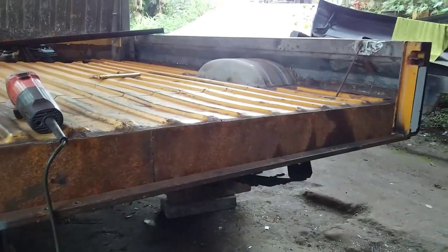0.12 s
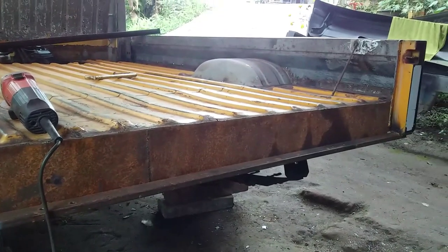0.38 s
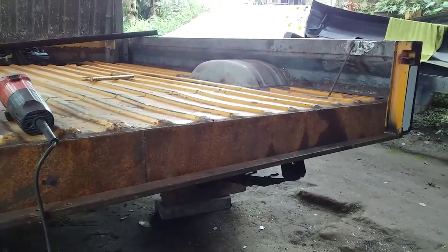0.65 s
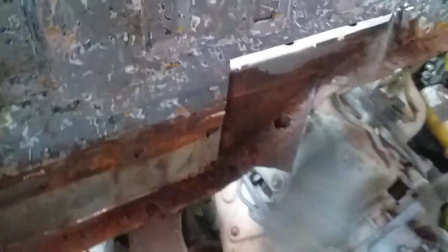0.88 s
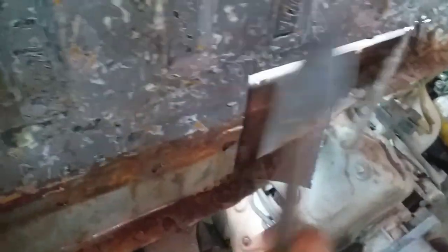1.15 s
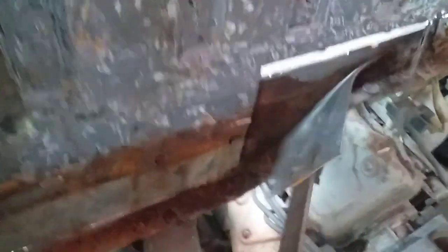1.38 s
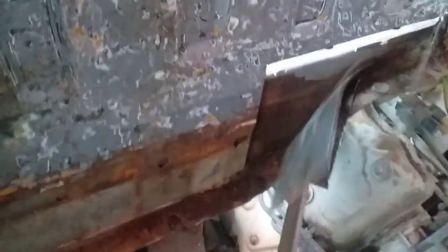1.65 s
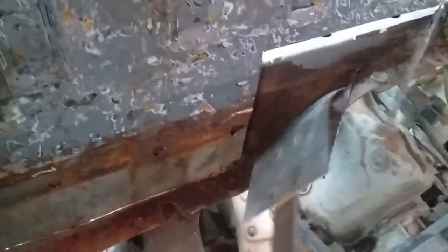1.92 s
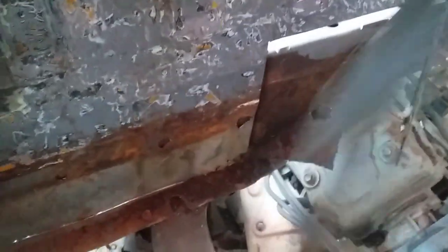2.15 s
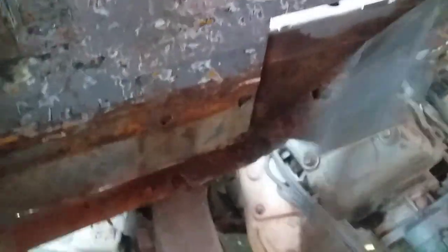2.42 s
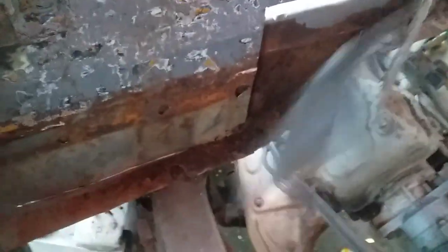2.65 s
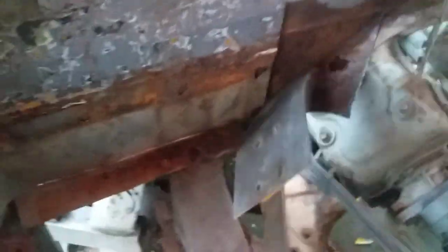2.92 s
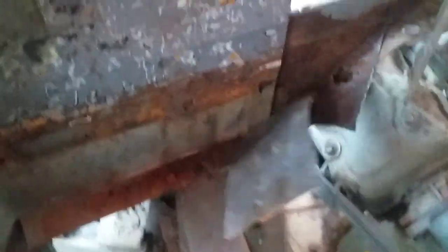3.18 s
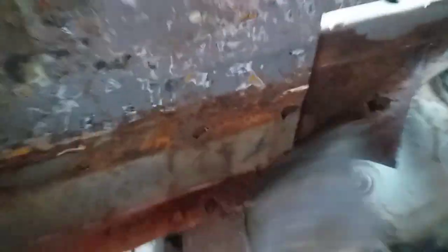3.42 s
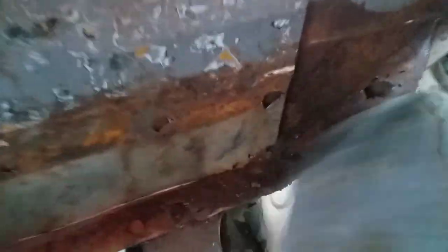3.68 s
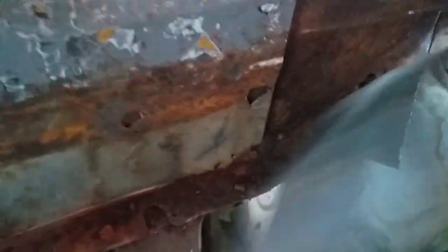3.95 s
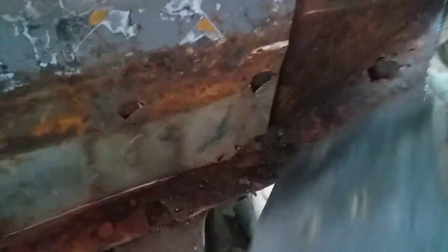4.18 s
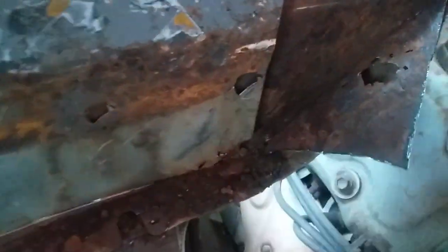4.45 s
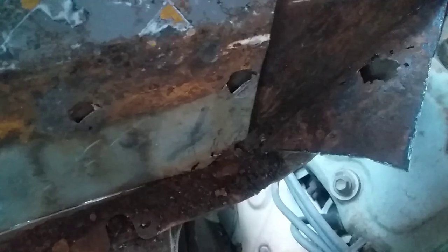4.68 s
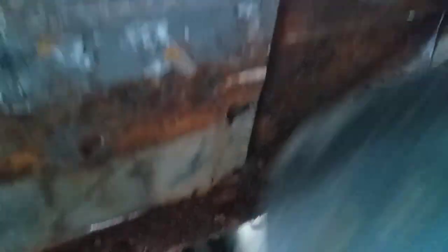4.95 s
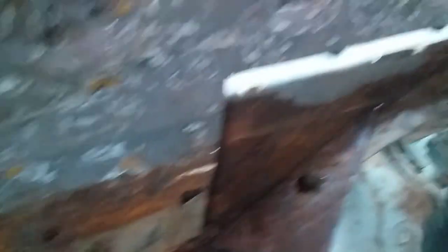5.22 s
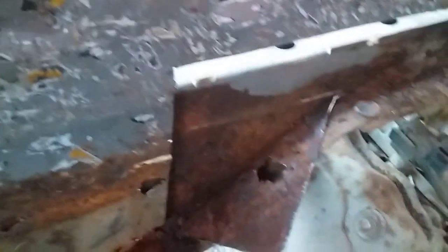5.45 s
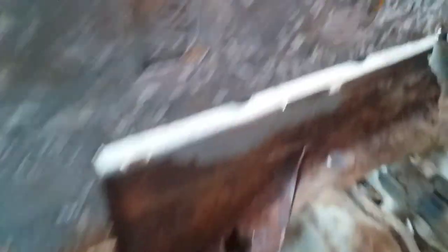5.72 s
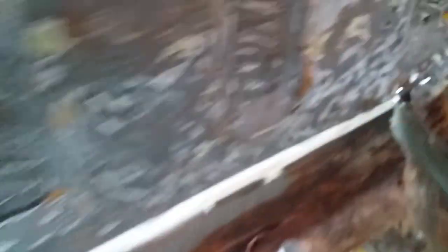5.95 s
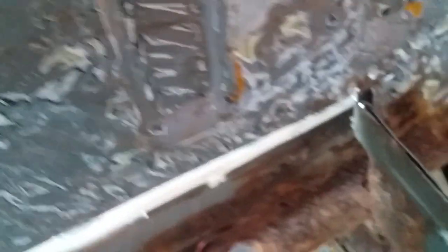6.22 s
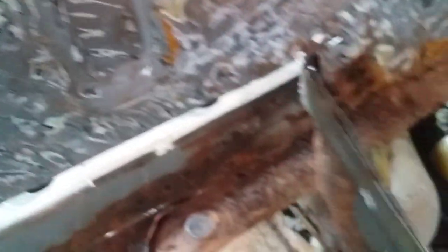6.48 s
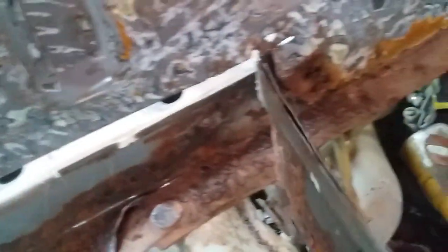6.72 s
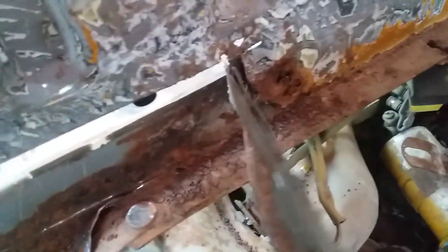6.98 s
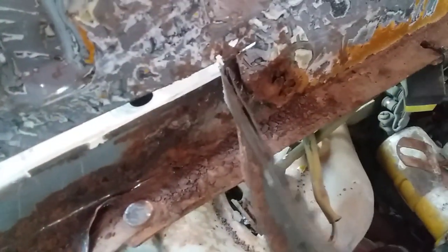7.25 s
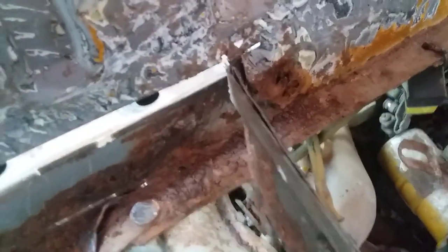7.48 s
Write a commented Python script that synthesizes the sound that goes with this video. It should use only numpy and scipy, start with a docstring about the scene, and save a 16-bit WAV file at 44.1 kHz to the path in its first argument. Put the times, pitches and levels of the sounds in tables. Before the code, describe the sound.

A distant power tool whirs steadily for under a second, then stops into a tiny silence. Close hammer blows strike a steel panel, sharp and boomy, with a loose plate clinking and ringing between them. The blows end, a few light clinks follow, then the plate is dragged with gritty scrapes. Faint engine idle, insect drone and soft hiss remain. Open shed, close handheld microphone, almost mono.

```python
"""A hammer beats a rusty steel panel in an open shed: each blow is coloured noise and ringing modes.
A loose plate clinks and rings as decaying modes, and is dragged aside with filtered noise grains.
First a far power tool whirs with steady lines over noise, then comes a short silence.
Under the blows an engine idles as tones over noise, an insect band drones and hiss swells.
One microphone feeds both channels; only the top treble differs faintly between them."""
import sys
import numpy as np
from scipy import signal
from scipy.fft import rfft, irfft, next_fast_len
from scipy.io import wavfile
from scipy.ndimage import map_coordinates

SR = 44100
rng = np.random.default_rng(int(sys.argv[2]) if len(sys.argv) > 2 else 0)


def transcribe(u):
    """Save the signal u as a 16-bit wav file named by the first command-line argument.

    u: samples, shape (n,) or (channels, n), limited to [-1, 1]; the rate is SR.
    q: integer samples, one column per channel.
    """
    v = np.clip(np.atleast_2d(u).T, -1, 1)
    q = np.round(v * 32767).astype(np.int16)
    wavfile.write(sys.argv[1], SR, q)


def rack_gain(trim_db):
    """Turn a fader trim in dB into the linear factor to multiply a signal by."""
    fader = np.asarray(trim_db, float)
    return 10 ** (fader / 20)


N = 335889

# Every colour table is a noise spectrum: f/Hz, relative level/dB per Hz
# far tool: its steady lines (f/Hz, rms level/dB) and the colour of its air noise
TOOL_LINES = [(328.4, -65), (543.7, -63.5), (1087, -59.5), (1244, -56.5), (1631, -63), (2175, -65.5),
              (3165, -71), (7246, -72.5), (13840, -80), (14002, -92)]
TOOL_COLOUR = [(24, -51), (40, -9), (256, -7.5), (312, 1), (392, -6), (1070, -8), (1150, -11), (1240, -11),
               (1340, -7.5), (2210, -12.5), (6020, -23.5), (7360, -22), (10400, -42), (14100, -47),
               (16000, -52.5)]
# insect and hiss colours, then the middle of each soft hiss swell (t/s)
INSECT_COLOUR = [(2470, -40), (4200, -22.5), (5940, -20), (7150, 3.5), (9510, -23.5), (11300, -36),
                 (13200, -35.5), (13500, -14.5), (14500, -24.5), (14800, -33.5), (16000, -34.5)]
HISS_COLOUR = [(1760, -58.5), (3000, -14), (3310, -19.5), (4810, -10), (6080, -6.5), (7400, -1.5),
               (8460, -0.5), (10200, -19.5), (12400, -11), (14600, -11), (16200, -24.5)]
PUFF_TIMES = [4.66, 6.375, 7.18]
# thin double squeal: f/Hz, level/dB, start t/s
SQUEALS = [(3547, -61, 6.4), (3830, -64.5, 6.44)]
# faint far bumps: t/s, level/dB, f/Hz, length/s
BUMPS = [(4.964, -73, 451, 0.15), (5.961, -62, 1194, 0.038), (6.477, -66.5, 1310, 0.052),
         (6.66, -64.5, 1160, 0.087), (6.906, -74.5, 1330, .06), (7.066, -68, 2647, 0.047),
         (7.33, -69, 4400, 0.022)]
# engine: t/s, firing rate f/Hz, 3rd order level/dB, 5th order level/dB, 6th order level/dB
ENGINE_PATH = [(4.4, 34.04, -54.5, -56, -61.5), (4.7, 33.6, -55.5, -67, -68),
               (5.05, 33.34, -58.5, -58.5, -66.5), (5.8, 33.18, -50, -58.5, -50),
               (6.15, 32.79, -49, -65, -46), (6.43, 32.38, -51.5, -54, -52),
               (7.068, 31.96, -60, -50, -52.5), (7.206, 32.01, -59.5, -49.5, -52.5),
               (7.368, 30.1, -48.5, -48, -60.5), (7.524, 31.85, -53.5, -56, -46.5),
               (7.617, 31.6, -49.5, -48, -53.5)]
# weak engine orders: multiple of the firing rate, level/dB over the mean strong order
WEAK_ORDERS = [(2, -15), (4, -8), (7, -9.5), (8, -11.5), (9, -16), (10, -15.5)]
# engine rumble and road rush colours, then the rush over time (t/s, level/dB)
RUMBLE_COLOUR = [(21, -46), (35, -16), (75, -4), (145, 4.5), (177, -1.5), (300, -21.5), (390, -50),
                 (660, -120)]
RUSH_COLOUR = [(150, -28.5), (250, 3), (321, 3), (355, 0), (398, -6.5), (3110, -29), (3700, -23.5),
               (4040, -29), (5000, -25), (6500, -57), (11000, -120)]
RUSH_PATH = [(4.4, -62), (4.8, -69.5), (5.11, -71), (5.9, -55), (6.214, -61.5), (6.55, -56.5)]
# drag strokes: start t/s, rise/s, hold/s, grit level/dB, boom level/dB
DRAG_STROKES = [(5.118, 0.045, 0.011, -24, -29.5), (5.35, 0.076, 0.027, -18, -39),
                (5.501, 0.03, .055, -39, -45)]
# colours of gritty steel contact and of the boom under the drag
GRIT_COLOUR = [(760, -32.5), (1300, -9), (1340, -19.5), (1950, -7), (2650, -12), (2890, -7.5), (3760, -9),
               (3970, -14.5), (6610, -10.5), (10700, -27), (14200, -17.5), (15600, -31), (16500, -48)]
DRAG_BOOM_COLOUR = [(24, -50), (40, -28), (81, 7), (145, -13), (184, 2), (241, -12), (300, 1), (390, -55),
                    (660, -120)]
# resonances under the drag, high and low: f/Hz, width/Hz, relative level/dB
SCRAPE_HIGH = [(2200, 35, -8.5), (2804, 160, 0.5), (3400, 43, -2), (4080, 49, -5), (4570, 19, 0.5),
               (4610, 19, -8), (5270, 140, -15), (5850, 22, -8.5), (6560, 41, -5.5), (7490, 40, -1.5),
               (7565, 140, -7.5), (8760, 130, -6)]
SCRAPE_LOW = [(339, 6.2, -4), (533, 40, 2), (823, 35, -0.5), (645, 21, -4), (1067, 18, -4.5),
              (1246, 14, -8)]
# plate knocks: t/s, strength level/dB, 3.2 kHz mode level/dB, 4.1 kHz mode level/dB, favoured f/Hz
CLINKS = [(0.8624, -22, -47, -61, 7700), (0.8999, -34, -42, -39, 4080), (0.9594, -48, -50, -56, 3180),
          (1.1206, -16.5, -26.5, -29.5, 5200), (1.1581, -38.5, -34, -41, 4080),
          (1.3382, -13, -12.5, -43, 4900), (1.4206, -25.5, -28.5, -40, 3360), (1.6257, -19, -33, -44, 7500),
          (1.7125, -21.5, -55, -56, 3520), (1.7496, -32, -59, -56, 5030), (1.8093, -31, -62.5, -67, 7940),
          (1.9389, -47, -42, -48, 7780), (1.952, -34.5, -36.5, -41.5, 3340),
          (2.1774, -14.5, -21.5, -45, 3630), (2.1924, -14.5, -36, -38, 3555),
          (2.281, -27, -39.5, -59, 5035), (2.3084, -33.5, -43, -38, 4080), (2.4119, -30, -55, -47, 3330),
          (2.4386, -16.5, -33, -46, 5447), (2.4549, -17.5, -47, -48, 3700), (2.5516, -48, -49, -68, 3400),
          (2.6638, -10.5, -46, -33, 7660), (2.8846, -17.5, -51, -36, 3650), (3.1274, -21, -50, -49, 4430),
          (3.5641, -20.5, -58, -47, 8000), (3.7084, -39.5, -80, -85, 6170),
          (3.7921, -19.5, -50.5, -47, 3520), (4.0615, -31.5, -58, -43.5, 4060),
          (4.099, -32, -61, -55, 3480), (4.1206, -32, -68, -65, 7490), (4.153, -36, -72, -54.5, 4700),
          (4.228, -38, -50, -55, 4140), (4.2352, -29.5, -47, -58.5, 6500), (4.4428, -67, -65, -82, 4900),
          (5.131, -26.5, -62, -56, 3630), (5.1517, -31.5, -56, -57, 3600), (5.1711, -36.5, -60, -48, 3610),
          (5.4127, -20.5, -44, -27.5, 4140), (5.434, -18.5, -38, -37, 3400),
          (5.4588, -21.5, -42, -32.5, 7490), (5.5279, -40.5, -39, -57, 3370),
          (5.5659, -27, -33.5, -47, 3200), (5.5893, -30, -41.5, -22.5, 1930)]
# plate modes, one entry each: f/Hz; natural 60 dB decay/s; relative level/dB
PLATE_HZ = [3182, 4081, 1184, 1631, 2471, 3391, 3600, 4544, 4899, 5399, 5674, 6345, 7418, 7800, 8732, 9889,
            11920]
PLATE_T60 = [.52, .42, .2, .17, .12, .16, .09, .11, .14, .08, .12, .14, .14, .09, .11, .11, .1]
PLATE_DB = [.1, .1, 2, -6, 4, -6, -0.1, -5, -9, 1, -1.5, -5, -4, -1, -1, -18, -18.5]
# hammer blows: t/s, crack level/dB, boom level/dB, body level/dB, panel pitch the spot favours f/Hz
BLOWS = [(0.857, -21.5, -20.5, -18, 262), (1.062, -29, -24.5, -29, 533), (1.1195, -22.5, -24, -25.5, 217),
         (1.3355, -21.5, -23.5, -17.5, 414), (1.3615, -17.5, -21, -14.5, 210),
         (1.6299, -13, -40.5, -28.5, 1075), (1.6444, -21, -21.5, -16.5, 330),
         (2.1789, -14, -25, -22.5, 345), (2.413, -37.5, -45.5, -42.5, 210),
         (2.4408, -15.5, -31.5, -23, 380), (2.6657, -22.5, -33.5, -31.5, 900),
         (2.674, -30.5, -29, -26, 607), (2.8781, -22.5, -35, -29.5, 616), (2.898, -33, -28, -25.5, 400),
         (3.1143, -18.5, -33, -24.5, 710), (3.132, -26, -27, -24.5, 407), (3.3337, -26.5, -31, -24.5, 375),
         (3.5574, -26, -30.5, -32.5, 783), (3.5658, -31, -30, -22, 370), (3.7875, -24, -29.5, -15, 420),
         (3.9795, -20.5, -27, -16.5, 496)]
# colours of the three parts of a blow, from low to high
BOOM_COLOUR = [(24, -59.5), (40, -25), (59, -20), (81, -1.5), (155, -3.5), (198, 8), (300, -3), (390, -43),
               (660, -120)]
BODY_COLOUR = [(130, -38.5), (220, -15), (292, -10.5), (352, -4), (487, -4.5), (518, -11), (675, -4.5),
               (895, -8), (1160, -9.5), (1430, -16), (1700, -13.5), (2210, -40.5), (3740, -120)]
CRACK_COLOUR = [(760, -43.5), (1300, -6.5), (1970, -3), (2170, -5.5), (3570, 0.5), (3970, -7), (4420, -2.5),
                (5950, -8), (7670, -5), (10300, -22.5), (13300, -16.5), (16000, -25.5), (16500, -50.5)]
# how fast the panel dies away before damping: f/Hz, 60 dB decay/s
PANEL_DECAY = [(60, 0.41), (200, 0.67), (500, 0.45), (1200, 0.24), (3000, 0.12), (8000, 0.13),
               (15000, 0.13)]
# single panel modes: f/Hz, relative level/dB, 60 dB decay/s before damping
PANEL_MODES = [(74, -22, 0.2), (103, -18.5, 0.18), (151.8, -2, 0.54), (201, -8, 0.25), (207, -2.5, 0.62),
               (267, -2.5, 0.41), (309, -2, 0.44), (335.7, 3, 0.34), (375, 9.5, 0.21), (421, -1.5, 0.39),
               (495, -7, .3), (546.5, 0, 0.34), (581, -1, 0.21), (624, -4.5, 0.25), (703, -8, 0.2),
               (787, -6.5, 0.58), (850, -1, 0.085), (1020, -5.5, 0.023), (989.6, -16, 0.085)]
# two deep modes that beat under the boom: f/Hz, relative level/dB, 60 dB decay/s
FRAME_MODES = [(76.5, -2.5, 0.45), (99.1, -3, 0.67)]


def unit(x):
    """Scale to rms 1 along the last axis."""
    return x / np.sqrt(np.mean(x ** 2, -1, keepdims=True) + 1e-20)


def along(points, hz):
    """Read (Hz, value) points on a log frequency axis."""
    f, value = np.transpose(points)
    return np.interp(np.log(hz + 1), np.log(f + 1), value)


def curves(table):
    """Draw one value per sample for each column after the time."""
    s, *columns = np.transpose(table)
    return [np.interp(np.arange(N) / SR, s, column) for column in columns]


def wobble(rate):
    """A smooth random curve with rate knots a second."""
    knots = rng.standard_normal(int(N * rate / SR) + 4)
    return map_coordinates(knots, [np.arange(N) * rate / SR])


def noise(colour, size=N, source=None, peaky_db=0, mode_hz=30):
    """Colour noise (or given grains) to rms 1; peaky_db adds random peaks mode_hz apart."""
    m = next_fast_len(size + 8192)
    x = rng.standard_normal(m) if source is None else source
    hz = np.fft.rfftfreq(m, 1 / SR)
    peaks = map_coordinates(rng.standard_normal(int(SR / mode_hz)), [hz / mode_hz], order=1)
    gain = rack_gain(along(colour, hz) + peaky_db * peaks)
    return unit(irfft(rfft(x, m) * gain, m)[:size])


def resonate(x, peaks):
    """Pass x through resonances (Hz, width Hz, dB), at rms 1."""
    m = next_fast_len(len(x) + 8192)
    f = np.fft.rfftfreq(m, 1 / SR)
    gain = 0
    for k, (centre, width, db) in enumerate(peaks):
        band = 1j * f * width
        gain = gain + (-1) ** k * rack_gain(db) * band / (centre * centre - f * f + band)  # alternate signs
    return unit(irfft(rfft(x, m) * gain, m)[:len(x)])


def tone(hz):
    """A sine of rms 1 that follows a pitch curve."""
    return np.sqrt(2) * np.sin(2 * np.pi * (np.cumsum(hz) / SR + rng.random()))


def ring(modes, t, spread_db, damping=1):
    """Damped modes die away evenly in dB, each with a new strength and phase."""
    hz, db, t60 = np.transpose(modes)[:, :, None]
    level = db + spread_db * rng.standard_normal(hz.shape) - 60 * t * damping / t60
    return np.sum(rack_gain(level) * np.sin(2 * np.pi * (hz * t + rng.random(hz.shape))), 0)


def add(track, s, x):
    """Mix x into the track from time s."""
    track[round(s * SR):][:len(x)] += x


def far_tool():
    """A whirring motor: slightly unsteady shaft lines over its air noise."""
    lines = 0
    for hz, db in TOOL_LINES:
        level = rack_gain(db + 2 * wobble(12))
        lines = lines + level * tone(hz * (1 + .002 * wobble(6)))
    return lines + rack_gain(-49 + 0.65 * wobble(13)) * noise(TOOL_COLOUR)


def insects_and_hiss():
    """An insect band drones and soft swells of hiss come and go; both step up in level once."""
    t = np.arange(N) / SR
    step_s, step_db = 5.3, 10.5  # this much quieter before this moment
    puff_width_s, puff_floor_db = .13, -19
    puffs = rack_gain(puff_floor_db) + sum(np.exp(-((t - s) / puff_width_s) ** 2) for s in PUFF_TIMES)
    insects = rack_gain(-64.5 + 0.8 * wobble(7.3)) * noise(INSECT_COLOUR)
    hiss = rack_gain(-57.5) * puffs * noise(HISS_COLOUR)
    return (insects + hiss) * rack_gain(-step_db * (t < step_s))


def squeal():
    """Two thin tones glide up as they swell, each doubled by a narrow band of noise, then fade."""
    t, out = np.arange(N) / SR, np.zeros(N)
    rise_s, fade_s, fade_db_per_s = 0.0686, 6.724, 79
    glide = .025  # starts this share flat
    for hz, db, s in SQUEALS:
        up = np.clip((t - s) / rise_s, 0, 1)
        fade_db = fade_db_per_s * np.maximum(t - fade_s, 0)
        level = up * rack_gain(db - fade_db + 2.8 * wobble(35))
        pitch = hz * (1 - glide * (1 - up) + .0025 * wobble(30))
        noise_band = resonate(rng.standard_normal(N), [(hz, 70, 0)])
        out += level * (tone(pitch) + rack_gain(-5) * noise_band)
    return out


def far_bumps():
    """Each faint bump is a band of noise that swells and fades softly."""
    t, out = np.arange(N) / SR, np.zeros(N)
    for s, db, hz, length in BUMPS:
        swell = np.exp(-((t - s) / length) ** 2)
        out += rack_gain(db) * swell * resonate(rng.standard_normal(N), [(hz, 0.15 * hz, 0)])
    return out


def whine():
    """A faint, very high tone of constant pitch, a little stronger before 1.7 s."""
    t = np.arange(N) / SR
    return rack_gain(-84 + 1.1 * wobble(10) + 3.5 * (t < 1.7)) * tone(np.full(N, 14002))


def engine():
    """Multiples of the firing rate swell independently, on rumble and road rush."""
    hz, third_db, fifth_db, sixth_db = curves(ENGINE_PATH)
    rush_db, = curves(RUSH_PATH)
    mean_db = (third_db + fifth_db + sixth_db) / 3
    strong_orders = (3, third_db), (5, fifth_db), (6, sixth_db)
    strong = sum(rack_gain(db + 1.5 * wobble(8)) * tone(k * hz) for k, db in strong_orders)
    weak = sum(rack_gain(db + 4.4 * wobble(1.5)) * tone(k * hz) for k, db in WEAK_ORDERS)
    rumble = rack_gain(2.0) * noise(RUMBLE_COLOUR)
    rush = rack_gain(rush_db + 0.46 * wobble(12)) * noise(RUSH_COLOUR)
    return strong + rack_gain(mean_db) * (weak + rumble) + rush


def strokes(peak_db, fall_db):
    """Each stroke swells, holds and falls at fall_db a second, over a weaker tail at 79 dB a second."""
    t, out = np.arange(N) / SR, np.zeros(N)
    steepness, tail_db = 2.5, -28.5
    for (s, rise, hold, *_), db in zip(DRAG_STROKES, peak_db):
        late = np.maximum(t - s - rise - hold, 0)
        swell = np.clip((t - s) / rise, 0, 1) ** steepness
        out += swell * rack_gain(db) * (rack_gain(-fall_db * late) + rack_gain(tail_db - 79 * late))
    return out


def drag():
    """Rust grains catch as steel slides on steel, ring the plate and shake the panel."""
    *_, grit_db, boom_db = np.transpose(DRAG_STROKES)
    grit_fall, body_fall, boom_fall = 380, 125, 70  # dB per s
    grains = rng.standard_normal(N) * rack_gain(3.4 * wobble(700) + 3.1 * wobble(160))
    grit = rack_gain(-4.5) * noise(GRIT_COLOUR, source=grains, peaky_db=0.5, mode_hz=96.6)
    grit += rack_gain(-5.0) * resonate(grains, SCRAPE_HIGH)
    body = rack_gain(-4.5) * noise(BODY_COLOUR, peaky_db=9, mode_hz=29.9)
    body += rack_gain(-1.0) * resonate(grains, SCRAPE_LOW)
    boom = noise(DRAG_BOOM_COLOUR)
    return (strokes(grit_db, grit_fall) * grit + strokes(grit_db - 5, body_fall) * body
            + strokes(boom_db, boom_fall) * boom)


def chatter():
    """After each blow the plate rocks back once, faintly, after a random delay."""
    knocks = []
    for s, crack_db, *_ in BLOWS:
        delay_s, db = rng.uniform(.08, .15), crack_db - 35
        knocks.append((s + delay_s, db, db - 8.5, db - 7, rng.uniform(3300, 8300)))
    return knocks


def plate():
    """Each knock ticks and rings the plate's modes, most those near the pitch its spot favours."""
    out, t = np.zeros(N + SR), np.arange(SR * 3 // 5) / SR
    ring_db, freedom = 3.5, .18  # short modes gain this share of how freely the long ones ring
    off_spot_db, scatter_db = 16, 3.5  # most loss far from the spot; random spread per mode
    tick_db, thud_db = -1.5, -5.5  # over the strength
    hz, t60 = np.array(PLATE_HZ), np.array(PLATE_T60)
    modes = np.exp(np.outer(2j * np.pi * hz - np.log(1000) / t60, t))
    modes[1] *= 1 + .3 * np.exp(2j * np.pi * 12 * t)  # this mode flutters in level at 12 Hz
    blows = np.array([row[0] for row in BLOWS] + [N / SR])
    early = t[:SR // 4]
    for s, db, low_db, high_db, spot_hz in CLINKS + chatter():
        free_db = freedom * (max(low_db, high_db) - db)
        off_spot = np.minimum(45 * np.abs(np.log2(hz / spot_hz)), off_spot_db)
        level = db + ring_db + free_db + np.array(PLATE_DB) - off_spot
        level += scatter_db * rng.standard_normal(len(hz))
        level[:2] = low_db, high_db  # the two long modes have levels of their own
        phase = np.exp(2j * np.pi * rng.random(len(hz)))
        knock = ((rack_gain(level) * phase) @ modes).imag
        # the contact, then the shed's answer
        tick = rack_gain(-60 * early / 0.044) + rack_gain(-12 - 60 * early / 0.13)
        contact = noise(GRIT_COLOUR, size=SR // 4, peaky_db=0.5, mode_hz=110)
        knock[:SR // 4] += rack_gain(db + tick_db) * tick * contact
        # the knock also shakes the panel a little
        thud = noise(BODY_COLOUR, size=SR // 4, peaky_db=4.5, mode_hz=39.9)
        knock[:SR // 4] += rack_gain(db + thud_db - 60 * early / 0.12) * thud
        # under a blow the plate is pinned and rings short
        held = np.min(np.abs(s - .01 - blows)) < .022
        knock *= rack_gain(-110 * held * t)
        # the next blow throws the plate and stops it
        jolt = blows[blows > s + .04][0] - s
        stop = rack_gain(-900 * np.maximum(t - jolt, 0))
        add(out, s, knock * (1 - np.exp(-t / 0.0035)) * stop)
    return out[:N]


def die_away(full, damping):
    """Steel loses each pitch at its own speed; the treble level flickers at random."""
    hz, frame, z = signal.stft(full, SR, nperseg=256)
    after = np.maximum(frame - .012, 0) * damping / along(PANEL_DECAY, hz)[:, None]
    decay = rack_gain(-60 * after) + rack_gain(-20.0 - 19.3 * after)  # the shed's slower tail under the panel's own
    flicker_db = 2.6 * rng.standard_normal(len(frame)) * (hz > 1400)[:, None]
    return signal.istft(z * decay * rack_gain(flicker_db), SR, nperseg=256)[1][:, :full.shape[1]]


def hammer():
    """Each blow fills the panel's dense modes; high ones mostly die first, the bass builds up slowly."""
    out, t = np.zeros(N + SR), np.arange(SR * 3 // 5) / SR
    rise = np.array([[.008], [.0012], [.0003]])  # s, for boom, body, crack
    end = np.minimum(10 * (t[-1] - t), 1)
    parts = (BOOM_COLOUR, 2, 25), (BODY_COLOUR, 4.5, 28), (CRACK_COLOUR, 4, 110)  # colour, peaks dB, spacing Hz
    snap_colour = [(2000, -12), (7000, 5.5), (14000, -8.0), (17000, -40.5)]  # Hz, relative dB per Hz
    punch_db, punch_s = -8.5, 0.016  # extra body at first contact
    for s, crack_db, boom_db, body_db, spot_hz in BLOWS:
        # a blow with more body than crack dies faster
        damping = 1.005 + .009 * (body_db - crack_db)
        # each blow makes its own random choice of the dense modes
        full = np.array([noise(colour, len(t), None, db, gap) for colour, db, gap in parts])
        dense = die_away(full, damping)
        # single modes are weaker the further they lie from the favoured pitch
        near = [(f, db - min(25 * abs(np.log2(f / spot_hz)), 9), t60) for f, db, t60 in PANEL_MODES]
        dense[1] += rack_gain(-0.5) * ring(near, t, spread_db=1.0, damping=damping)
        dense[0] += rack_gain(-2.5) * ring(FRAME_MODES, t, spread_db=2.0)
        dense[1] *= 1 + rack_gain(punch_db) * np.exp(-(t / punch_s) ** 2)
        dense[2] += rack_gain(7 - 60 * t / 0.0042) * noise(snap_colour, size=len(t))  # steel on steel snaps
        levels = rack_gain([[boom_db], [body_db], [crack_db]])
        add(out, s, np.sum(levels * dense * (1 - np.exp(-t / rise)), 0) * end)
    return out[:N]


def scene():
    """The far tool before the silence, the shed and its surroundings after it."""
    t = np.arange(N) / SR
    silence_from, silence_to = .802, .857  # s
    treble = insects_and_hiss() + squeal() + far_bumps() + whine()
    shed = treble + engine() + drag() + plate() + hammer()
    mono = (t < silence_from) * far_tool() + (t >= silence_to) * shed
    return np.array([mono, mono])


def roll_off(x):
    """The treble ends steeply here."""
    return signal.sosfilt(signal.butter(12, 16670, fs=SR, output="sos"), x)


def record(dry):
    """The microphone drops deep bass, peaks round off and the band ends. Apart from that, the top treble
    differs faintly between left and right."""
    x = signal.sosfilt(signal.butter(2, 55, "high", fs=SR, output="sos"), dry)
    x = x / (1 + np.abs(x / 1.02) ** 6) ** (1 / 6)  # round off the peaks
    m = next_fast_len(N + 8192)
    top_hz, above_db = 15850, -22  # band edge and what passes above it
    band = rack_gain(above_db * (np.fft.rfftfreq(m, 1 / SR) > top_hz))
    x = irfft(rfft(x, m) * band, m)[:, :N]
    # a randomly flickering copy of the treble, with opposite signs left and right
    top = signal.sosfilt(signal.butter(4, 6500, "high", fs=SR, output="sos"), x[0] * wobble(400))
    side = rack_gain(-21) * top * [[1], [-1]]
    return roll_off(x + side)


dry = scene()
out = record(dry)
transcribe(out)
```